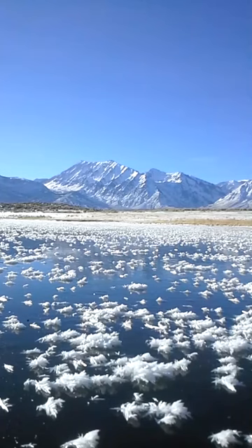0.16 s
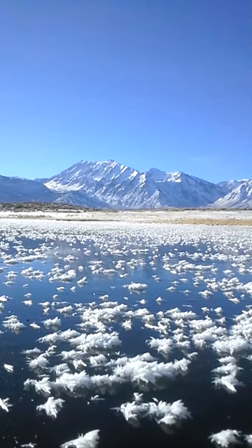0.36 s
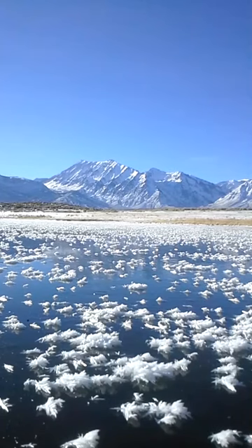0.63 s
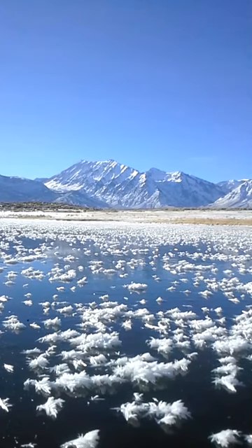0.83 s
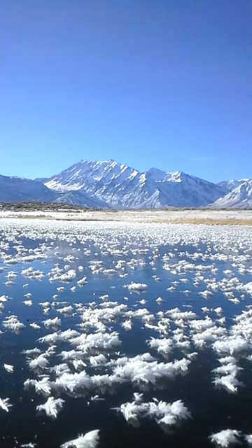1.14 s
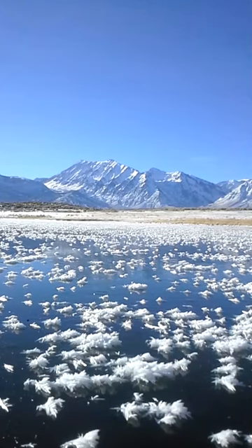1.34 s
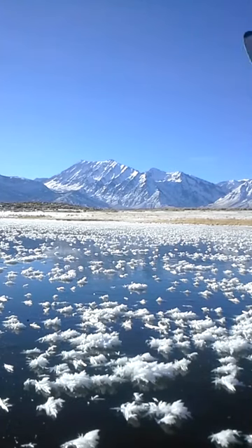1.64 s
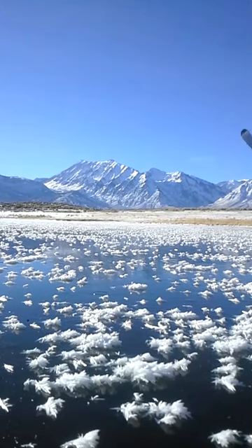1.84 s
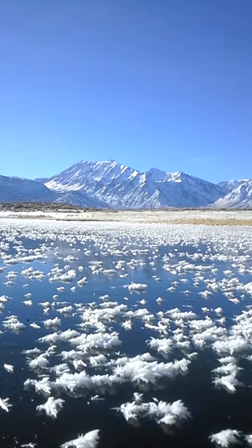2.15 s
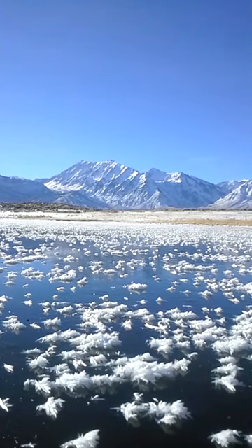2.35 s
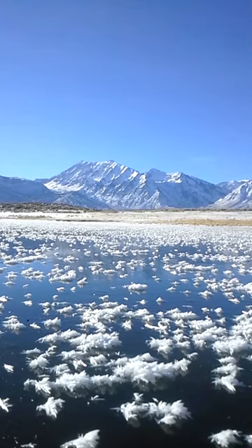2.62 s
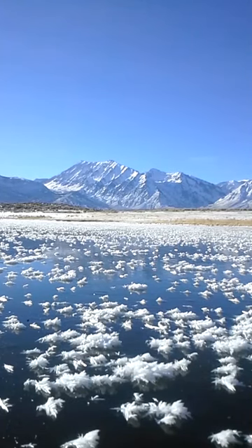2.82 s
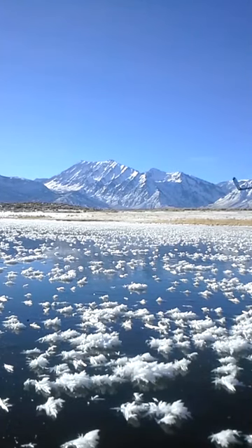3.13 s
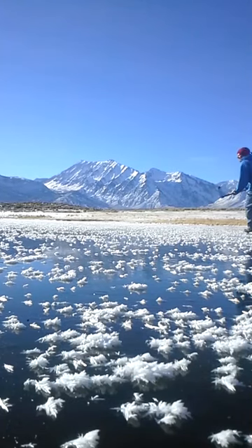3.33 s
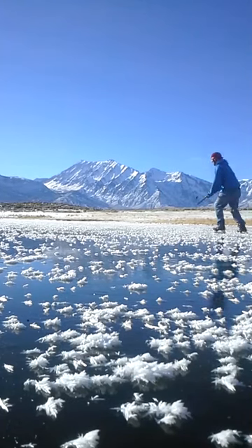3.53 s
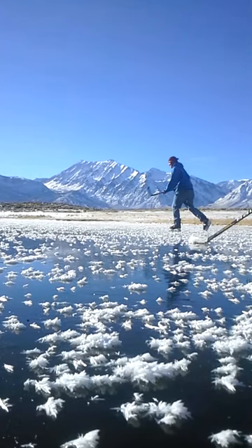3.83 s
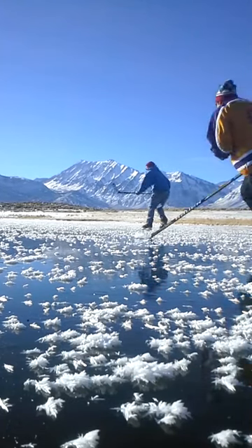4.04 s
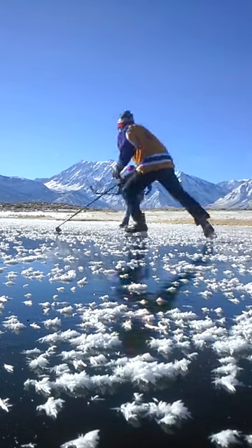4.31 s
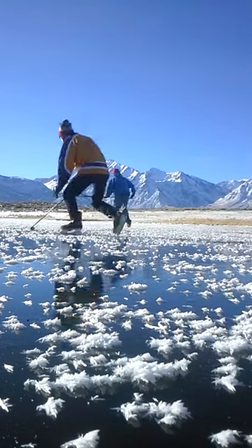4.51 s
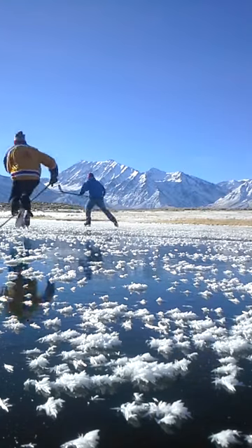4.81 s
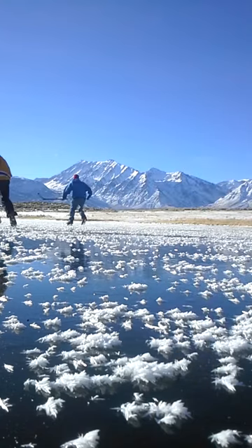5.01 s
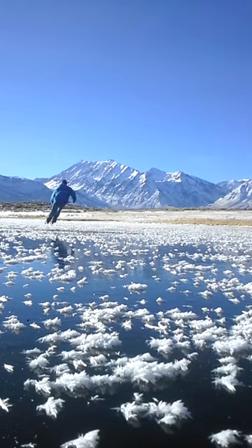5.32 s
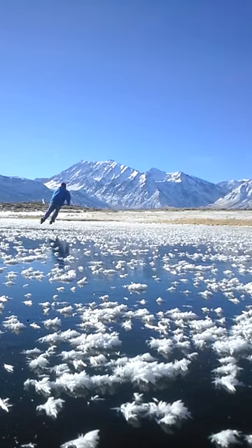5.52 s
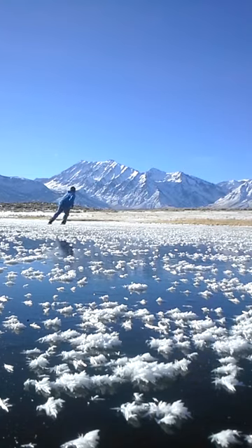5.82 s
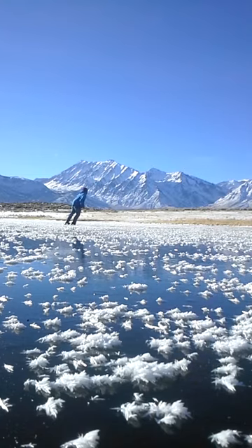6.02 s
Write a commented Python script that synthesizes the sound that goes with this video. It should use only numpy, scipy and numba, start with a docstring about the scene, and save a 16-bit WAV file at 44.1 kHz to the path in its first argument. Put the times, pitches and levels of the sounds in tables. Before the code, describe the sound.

Outdoors on a frozen lake, skates push off close by in quick raspy scrapes with sharp cracks, frosty hiss and thudding steps that send short falling chirps through the hollow ice. The strokes ease, then a very hard landing near three seconds clips the microphone. Scattered scrapes and coasting follow, duller and quieter, over still air and a very faint high whine.

```python
"""Skaters stride over a frozen pond: blades crack, grind and hiss as shaped fracture noise and moving resonances.
The first push-offs are interleaved with footfalls, short falling chirps over the hollow rumble of the ice sheet.
Near three seconds comes the hardest landing; the loudest peaks are limited and clipped.
Scattered strokes and coasting follow. After about 4.6 s the finest fizz dulls, then partly returns,
while the rumble leans towards a singing note. Still air and a faint electronic whine last throughout."""
import sys
import numpy as np
from scipy import signal
from scipy.fft import rfft, irfft, next_fast_len
from scipy.io import wavfile
from scipy.ndimage import uniform_filter1d, minimum_filter1d
from numba import njit

SR = 44100
rng = np.random.default_rng(int(sys.argv[2]) if len(sys.argv) > 2 else 0)


def store_pcm(level_fs):
    """Save levels as 16-bit WAV."""
    pcm = np.round(np.clip(level_fs, -1, 1) * 32767).astype(np.int16)
    wavfile.write(sys.argv[1], SR, np.atleast_2d(pcm).T)


N = 271656
TIME = np.arange(N) / SR

# colour of grinding ice: frequency_hz, relative_level_db
GRIND_COLOUR = [(500, -23), (780, -8), (1000, 4), (1600, 6.5), (2500, 3), (3300, 6.5), (4200, 2),
                (6000, -28)]
# colour of frost spray: frequency_hz, relative_level_db
SPRAY_COLOUR = [(1800, -12.5), (3000, 8.5), (4000, 19.5), (5000, 16), (6200, 11.5), (7000, 3), (8000, 1),
                (11000, -0.5), (16000, -5.5)]


def from_db(db):
    """Decibels to gain."""
    return 10 ** (np.asarray(db) / 20)


def rms_one(x):
    """Scale to unit rms."""
    return x / np.sqrt(np.mean(x ** 2) + 1e-20)


def in_time(rows):
    """One curve per column, rows joined by straight lines."""
    s, *columns = np.transpose(rows)
    return [np.interp(TIME, s, column) for column in columns]


def drift(rate):
    """Random curve of spread 1 with rate new values a second, joined by straight lines."""
    values = rng.standard_normal(N // 8)
    return rms_one(np.interp(TIME * rate, np.arange(len(values)), values))


def colour(x, spectrum):
    """Causal (minimum-phase) filter of the given spectrum; white noise keeps its level."""
    size = next_fast_len(N + 8192, True)
    hz, db = np.transpose(spectrum)
    log_hz = np.log(np.fft.rfftfreq(size, 1 / SR) + 1)
    gain = rms_one(from_db(np.interp(log_hz, np.log(hz), db)))
    # folding the cepstrum forward in time gives the minimum phase
    cepstrum = irfft(np.log(gain), size)
    cepstrum[1:size // 2] *= 2
    cepstrum[size // 2 + 1:] = 0
    response = np.exp(rfft(cepstrum))
    return irfft(rfft(x, size) * response, size)[:N]


@njit
def slide(x, pitch, damping):
    """Resonance whose pitch (cycles per sample) may move; gain 1 on top."""
    out, band, low = np.zeros(len(x)), 0., 0.
    for i in range(len(x)):
        g = np.tan(np.pi * pitch[i])
        v = (band + g * (x[i] + 1e-18 - low)) / (1 + g * (g + damping[i]))
        band, low = 2 * v - band, low + 2 * g * v
        out[i] = damping[i] * v
    return out


def resonate(x, hz, width_hz):
    """A moving resonance, with a wider one after it to steepen its skirts."""
    narrow = slide(x, hz / SR, width_hz / hz)
    return slide(narrow, hz / SR, 2 * width_hz / hz)


def even(x, span_s):
    """Hold the level steady over spans longer than span_s; the grain stays."""
    power = uniform_filter1d(x * x, max(int(span_s * SR), 3))
    return x / np.sqrt(np.abs(power) + 1e-12)


def blend(broad, focused, share):
    """Mix two sounds by shares of power, at a steady level of 1."""
    share = np.clip(share, 0, 1)
    mix = np.sqrt(1 - share) * rms_one(broad) + np.sqrt(share) * rms_one(focused)
    return even(mix, span_s=0.041)


def crumble(rough_db, chips_per_s, chip_db):
    """Frost crushed under a blade: a juddering stream of tiny fractures and a few larger chips."""
    judder = from_db(rough_db * drift(650))
    stream = rms_one(rng.standard_normal(N) * judder)
    sizes = from_db(3.0 * np.minimum(rng.exponential(1, N), 3.5))
    signs = rng.choice([-1, 1], N)
    chipping = rng.random(N) < chips_per_s / SR
    chips = rms_one(sizes * signs * chipping)
    return rms_one(stream + from_db(chip_db) * chips)


def electronic_whine():
    """A steady, faint high sine tone."""
    pitch_hz, rms_db = 15000, -54
    return from_db(rms_db) * np.sqrt(2) * np.sin(2 * np.pi * pitch_hz * TIME)


def still_air():
    """The quiet outdoor bed: steady noise with a broad colour."""
    # colour of still air: frequency_hz, relative_level_db
    air_colour = [(30, -29), (100, 6), (600, -6.5), (2500, -4), (7000, -20.5), (16000, -11.5)]
    rms_db = -49
    return from_db(rms_db) * colour(rng.standard_normal(N), air_colour)


def chirp(sweep_s, start_hz, fall):
    """Bending waves spread out in the sheet: highs come first, pitch falls, late on as one over time squared."""
    age = np.arange(int(.06 * SR)) / SR / sweep_s   # in sweep times
    cycles = start_hz * sweep_s * age / (1 + fall * age)
    swell = age * np.exp(-3.2 * age)
    return np.sin(2 * np.pi * cycles) * swell / swell.max()


def ice_sheet(sheet_db):
    """Countless small chirps merge into a rumble; the bending wave that keeps pace with sound in air sings out."""
    # colour of the ice sheet: frequency_hz, relative_level_db
    sheet_colour = [(25, -56), (60, -19), (120, 1), (200, 3.5), (350, 9), (580, 11), (700, 4.5),
                    (850, -4.5), (1300, -26.5)]
    # the note that the ice sheet sings: time_s, pitch_hz, share_of_power (0-1)
    singing = [(0, 213, 0.44), (.5, 457, 0), (.7, 627, 0.8), (.95, 507, 0.06), (1.17, 610, 0.6),
               (1.33, 580, 0), (1.56, 597, 0.32), (2.15, 597, .45), (2.33, 437, 0.27), (2.7, 386, 0.46),
               (2.84, 810, 0.1), (3.0, 505, 0.08), (3.8, 602, .25), (4.6, 620, 0.57), (6.16, 618, 0.64)]
    note_hz, share = in_time(singing)
    knocks = crumble(rough_db=2.5, chips_per_s=64, chip_db=1.0)
    small_chirp = chirp(sweep_s=0.00865, start_hz=1923.0, fall=2.19)
    spread = signal.fftconvolve(knocks, small_chirp)[:N]
    rumble = even(colour(knocks, sheet_colour) + from_db(-14) * rms_one(spread), span_s=0.0494)
    note = even(resonate(rng.standard_normal(N), note_hz, width_hz=55), span_s=.06)
    return from_db(sheet_db) * blend(rumble, note, share)


def footfalls(scatter, crunch_s, lowest_hz):
    """Each heavy step crunches down unevenly and sends a falling chirp through the sheet."""
    # steps that flex the sheet: start_s, sweep_s (time scale), peak_db (ahead of the low cut)
    steps = [(0.1421, 0.0038, -9.5), (0.166, 0.0071, -1), (0.247, 0.006, -9), (0.273, 0.0067, -9.5),
             (0.291, 0.0044, -21), (0.4991, 0.0061, -10), (0.573, 0.0037, -13), (0.693, 0.0079, -17.5),
             (0.9335, 0.0061, -9), (0.942, 0.0072, -16), (1.139, 0.01, -29), (1.266, 0.0076, -16),
             (1.303, 0.0107, -19), (1.716, 0.0099, -15), (3.083, 0.005, -13), (3.407, 0.0043, -4),
             (5.183, 0.013, -22), (5.462, 0.017, -23.5)]
    out = np.zeros(N)
    age = TIME[:SR // 100]
    for s, sweep_s, peak_db in steps:
        crunch = np.exp(-age / crunch_s) / np.sqrt(crunch_s * SR / 2)
        force = scatter * rng.standard_normal(len(age)) * crunch
        force[0] = 1   # first impact
        wave = np.convolve(chirp(sweep_s, start_hz=1583, fall=1.447), force)
        start = int(s * SR)
        out[start:start + len(wave)] += from_db(peak_db) * wave / np.abs(wave).max()
    low_cut = signal.butter(2, lowest_hz, "high", fs=SR, output="sos")
    return signal.sosfilt(low_cut, out)


def blade(x, pitch_hz, width_hz, broad_db):
    """A struck blade: a broad crunch and a short ring."""
    crunch = colour(x, GRIND_COLOUR)
    return resonate(crunch, pitch_hz, width_hz) + from_db(broad_db) * crunch


def cracks(release_s, grind_gain_db, spray_gain_db, snap_db):
    """A landing edge snaps the surface, crushes the ice for a few milliseconds and then lets go."""
    # blades landing and chipping the ice; levels are relative, ahead of the gains above:
    # start_s, length_s, grind_level_db, spray_level_db, pitch_hz
    landings = [(.167, 0.0038, 1.5, -10, 1880), (.265, 0.0073, -8.5, -24, 1800),
                (0.5, 0.0054, -7, -15, 2190), (0.617, 0.0026, -14, -22, 1960),
                (.635, 0.0027, -7, -35, 1870), (.74, 0.0019, -18, -18, 2120), (.934, 0.0024, -1, -11, 1860),
                (0.943, 0.0017, -5.5, -19, 1340), (0.96, .0016, -8.5, -28, 1450),
                (1.103, 0.004, -20.5, -33, 3280), (1.274, .0012, -16, -33, 3030),
                (1.308, 0.0016, -13.5, -16, 1890), (1.629, 0.0025, -11.5, -28, 2220),
                (1.644, 0.0026, -11, -15, 1540), (1.724, 0.0071, -7.5, -14.5, 2880),
                (1.747, 0.012, -16.5, -15.5, 2520), (1.988, 0.011, -20.5, -30.5, 3230),
                (2.037, 0.0072, -40, -28, 2850), (2.24, 0.0051, -25.5, -28, 2100),
                (2.468, .0096, -25, -28, 1610), (2.994, 0.005, 8.5, -4, 2500),
                (3.045, 0.0027, -10, -28, 2070), (3.069, 0.0048, -10.5, -32, 1750),
                (3.086, 0.0031, 1.5, -12.5, 1800), (3.147, 0.0095, -12, -21, 1690),
                (3.204, 0.004, -8.5, -22, 2110), (3.235, .0019, -12, -25, 2570),
                (3.412, 0.0048, -13, -17, 1680), (3.442, 0.0042, -9, -19, 2350),
                (4.28, 0.0051, -13, -27.5, 2220), (4.328, .0024, -13, -38, 2000),
                (4.442, 0.0056, -6, -15, 1900), (4.463, 0.0085, -14, -21, 2210),
                (4.492, 0.01, -21, -22.5, 1930), (5.24, .0013, -20, -24, 2360),
                (5.319, 0.00099, -11, -25.5, 2680), (5.484, 0.014, -18, -25, 2700),
                (5.59, 0.0065, -19, -31, 2400)]
    noise = rng.standard_normal(N)
    # the pitch holds through each landing and glides on to the next
    pitch_points = [(s + edge, hz) for s, length, _, _, hz in landings for edge in (0, length)]
    pitch_hz, = in_time(pitch_points)
    grind, spray, snap = np.zeros((3, N))
    age = TIME[:SR // 20]
    for s, length, grind_db, spray_db, _ in landings:
        span = slice(int(s * SR), int(s * SR) + len(age))
        crush = np.exp(-.6 * age / length - np.maximum(age - length, 0) / release_s)
        burst = noise[span] * crush
        burst *= np.sqrt(length * SR / np.sum(burst ** 2))   # energy follows length
        grind[span] += from_db(grind_db + grind_gain_db) * burst
        spray[span] += from_db(spray_db + spray_gain_db) * burst
        snap[span] += from_db(spray_db + snap_db) * noise[span] * np.exp(-age / 0.00024)
    ring = blade(grind, pitch_hz, width_hz=990, broad_db=-8.5)
    return ring + colour(spray, SPRAY_COLOUR) + snap


def pressure(start, length, crest):
    """The edge catches, the skater leans in up to the crest, eases off and lifts the blade."""
    attack_s, release_s = 0.0019, 0.02
    edge = from_db(-9.5)   # pressure at both ends, against the crest
    lean = max(length - attack_s, 0) * np.clip([0, crest, 1], 0, 1) + start + attack_s
    return np.interp(TIME, [start, *lean, lean[-1] + release_s], [0, edge, 1, edge, 0])


def skating():
    """Strokes add their power to the coasting blades; power also weights the colour of grind and hiss."""
    # a blade pushes off; levels are the stroke's own at its crest, pitch is that halfway through:
    # start_s, length_s, crest (share of length), grind_level_db, spray_level_db, sheet_level_db,
    # grind_pitch_hz, bite (0 broad scrape - 1 narrow rasp), hiss_pitch_hz, hiss_focus (0-1)
    strokes = [(0, 0.081, 0.2, -28, -36, -37.5, 2200, 1, 4460, 0.1),
               (0.216, 0.085, 0.63, -15, -26.5, -18.5, 1980, 0.9, 3900, .05),
               (0.338, 0.051, 0.32, -26.5, -34, -56, 2650, 0.87, 3900, .05),
               (0.499, 0.089, 0.13, -4, -19, -32, 2190, .99, 4120, 0.6),
               (0.599, 0.056, 0.4, -15, -18.5, -36, 1980, 1, 4670, 0.9),
               (0.677, 0.069, 0.25, -17, -27, -23.5, 2090, 0.82, 4550, 0.8),
               (0.801, 0.096, 0.4, -32.5, -36.5, -53, 2840, 0.6, 4000, .05),
               (0.948, 0.13, .8, -18.5, -24, -31, 1830, 0.7, 4700, 0.3),
               (1.14, 0.066, 0.2, -27, -30, -26.5, 2290, 0.34, 4140, 0.4),
               (1.303, 0.073, 0.08, -22.5, -21, -32.5, 2560, 0.98, 5860, 0.63),
               (1.39, .1, 0.58, -22, -22.5, -55, 2110, 0.2, 5900, 0.82),
               (1.532, 0.074, 0.9, -28.5, -31.5, -30, 1980, .2, 5100, 0.1),
               (1.627, 0.04, 0.61, -15.5, -21.5, -26.5, 1850, 0.16, 5200, 0.2),
               (1.767, 0.055, 0.43, -22.5, -25, -26, 2360, 0.2, 5500, .07),
               (1.92, 0.037, .3, -30, -28.5, -51, 1840, 0.3, 5830, 1),
               (2.031, 0.16, 0.3, -23, -25.5, -28.5, 1880, 0.04, 4550, 0.64),
               (2.259, 0.13, 0.75, -32.5, -36.5, -30.5, 1580, 0.9, 5870, 0.46),
               (2.459, 0.091, .4, -21, -26, -27, 1700, .55, 5730, 0.7),
               (2.549, 0.12, .65, -24, -27, -48, 2100, 0.1, 4140, 0.8),
               (2.721, 0.11, 0.69, -15, -22, -22.5, 1780, 0.6, 3800, 0.4),
               (3.001, 0.048, 0.16, -5.5, -12, -23, 2710, 0.61, 3640, 0),
               (3.093, 0.061, 0.76, -7.5, -21.5, -35, 1980, 0.77, 4630, 0.6),
               (3.274, 0.27, 0.21, -19.5, -24, -28, 1770, 0.18, 5000, 0),
               (3.519, 0.096, 1, -18, -21.5, -35, 1750, 0.17, 5370, 0),
               (3.963, 0.053, 0.71, -13, -27, -22.5, 1600, 0.97, 5400, 0.2),
               (4.271, .1, .4, -18.5, -30.5, -24, 1670, 0.97, 5000, 0.6),
               (4.497, 0.092, .48, -18.5, -22.5, -39, 2180, 0.8, 4750, 0),
               (4.697, 0.12, 1, -17, -28, -26, 2450, 0.8, 4500, 1),
               (5.101, .028, .2, -31, -38, -40, 1700, 0.2, 5000, .5),
               (5.178, 0.072, 0.99, -23, -30.5, -31, 2400, 0, 4300, .95),
               (5.581, 0.16, .06, -26, -30.5, -33, 2410, 0.65, 4200, 0.8)]
    # blades running on, around which bumps sway: time_s, grind_level_db, spray_level_db, sheet_level_db
    coasting = [(0, -24, -31, -61), (.2, -33, -38.5, -29.5), (.33, -42.5, -40, -53),
                (.62, -25.5, -30.5, -43), (.91, -43.5, -42, -46), (1.28, -43, -45.5, -39.5),
                (1.45, -29.5, -38.5, -37), (1.9, -42, -44.5, -44), (2.18, -38, -33, -37),
                (2.43, -48, -60, -40.5), (2.62, -28.5, -42, -26.5), (2.92, -35, -40.5, -41),
                (3.22, -26.5, -29.5, -36), (3.66, -37.5, -40.5, -41), (3.77, -29, -39.5, -32.5),
                (4.2, -33.5, -44, -36.5), (4.42, -37.5, -47, -40), (4.63, -28, -36, -33),
                (4.87, -29, -40.5, -37.5), (4.93, -45.5, -53, -49.5), (5.06, -42.5, -53, -47),
                (5.14, -33.5, -41.5, -35.5), (5.4, -38, -48, -35.5), (5.87, -36, -47, -36.5),
                (6.16, -41, -52, -39)]
    # how the coasting edge is set, pitch ahead of its wander: time_s, grind_pitch_hz, bite (0-1)
    coasting_edge = [(0, 2170, 0.82), (.85, 2200, 0.4), (1.5, 1700, 0.14), (3.3, 1820, .25),
                     (3.75, 1400, 0.94), (4.2, 1530, 0.96), (4.65, 2170, 0.7), (5.1, 1780, .3),
                     (5.9, 2200, 0.54)]
    bumps_db, bumps_per_s = 3, 25   # uneven ice makes the coasting swell and sink
    wander, wander_per_s = 0.064, 15   # share by which the coasting pitch strays, and how often
    coast_hiss_hz, coast_focus = 4260, 0.12
    pitch_sag = 0.036   # share by which the grind falls over a stroke

    coast_db = in_time(coasting) + bumps_db * drift(bumps_per_s)
    grind, spray, sheet = from_db(coast_db) ** 2   # powers
    # pitch and bite, then hiss pitch and focus, each weighted by power
    rasp = np.array(in_time(coasting_edge)) * grind
    rasp[0] *= np.exp(wander * drift(wander_per_s))
    hiss = np.outer([coast_hiss_hz, coast_focus], spray)
    for start, length, crest, grind_db, spray_db, sheet_db, pitch_hz, bite, hiss_hz, focus in strokes:
        press = pressure(start, length, crest)
        on = press > 0
        crest_gains = from_db([grind_db, spray_db, sheet_db])
        grinding, spraying, flexing = np.outer(crest_gains, press[on]) ** 2
        grind[on] += grinding
        spray[on] += spraying
        sheet[on] += flexing
        progress = np.minimum((TIME[on] - start) / length, 1)
        sagging_hz = pitch_hz * (1 - pitch_sag * (progress - .5))
        rasp[:, on] += [grinding * sagging_hz, grinding * bite]
        hiss[:, on] += np.outer([hiss_hz, focus], spraying)
    return 10 * np.log10([grind, spray, sheet]), rasp / grind, hiss / spray


def ice_mirror(x, lag_s, sway, share):
    """The ice reflects a late copy, whose lag shifts as the boots move."""
    moving_lag_s = lag_s * np.exp(sway * drift(7))
    return x + share * np.interp(TIME - moving_lag_s, TIME, x)


def gliding(grind_db, spray_db, pitch_hz, bite, hiss_hz, focus):
    """The same fractures drive grind and spray; bite and focus gather them into resonances."""
    fractures = crumble(rough_db=3.0, chips_per_s=160, chip_db=-5.5)
    fractures = ice_mirror(fractures, lag_s=0.001133, sway=0.298, share=0.55)
    rasp = resonate(fractures, pitch_hz, width_hz=740)
    grind = blend(colour(fractures, GRIND_COLOUR), rasp, bite ** 2)
    shattering = crumble(rough_db=4.0, chips_per_s=90, chip_db=-2.5)   # frost shatters too
    flakes = rms_one(fractures + from_db(-2.0) * shattering)
    hiss = resonate(flakes, hiss_hz, width_hz=1050)
    spray = blend(colour(flakes, SPRAY_COLOUR), hiss, focus ** 2)
    return from_db(grind_db) * grind + from_db(spray_db) * spray


def dull_fizz(x, dullness):
    """Dullness takes away the finest fizz; at none it is lifted a little."""
    low_pass = signal.butter(3, 6300, fs=SR, output="sos")
    body = signal.sosfiltfilt(low_pass, x)
    fizz = x - body
    return body + from_db(3 - 42 * dullness) * fizz


def scene():
    """Skates and ice over still air."""
    # how dull the finest fizz of the blades is: time_s, dullness (0-1)
    fizz_dullness = [(0, 0.44), (.6, 0), (2.3, .13), (2.7, 0.28), (3.3, 0.14), (4.55, 0.12), (4.7, .85),
                     (6.16, 0.26)]
    dullness, = in_time(fizz_dullness)
    (grind_db, spray_db, sheet_db), (pitch_hz, bite), (hiss_hz, focus) = skating()
    ice = ice_sheet(sheet_db) + footfalls(scatter=0.88, crunch_s=0.003, lowest_hz=109)
    landing = cracks(release_s=0.0027, grind_gain_db=1.0, spray_gain_db=3.5, snap_db=-8.0)
    skates = landing + gliding(grind_db, spray_db, pitch_hz, bite, hiss_hz, focus)
    return (still_air() + ice + dull_fizz(skates, dullness))[None]


def record(dry):
    """A faint electronic whine, a fast limiter with clipped peaks, and the top cut off."""
    x = dry[0] + electronic_whine()
    limit, ceiling, cutoff_hz = 1.05, .76, 16000
    room_left = np.minimum(1, limit / (np.abs(x) + 1e-9))
    x = x * uniform_filter1d(minimum_filter1d(room_left, size=25), size=25)
    x = np.clip(x, -ceiling, ceiling)
    top_cut = signal.ellip(8, .05, 50, cutoff_hz, fs=SR, output="sos")
    return signal.sosfiltfilt(top_cut, x)[None]


dry = scene()
out = record(dry)
store_pcm(out)
```